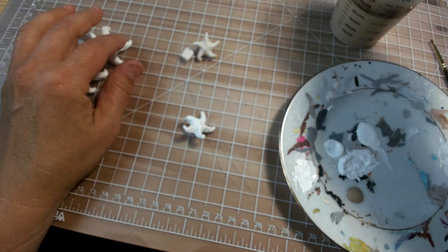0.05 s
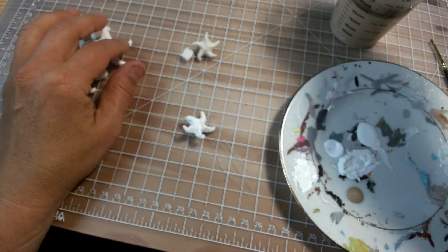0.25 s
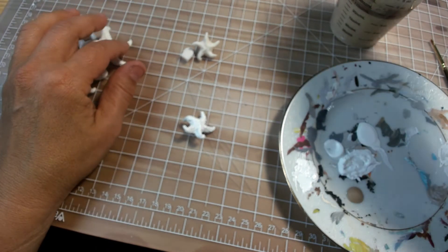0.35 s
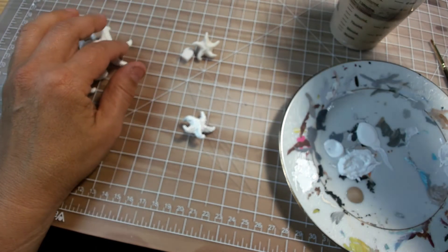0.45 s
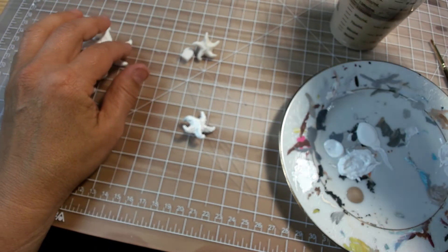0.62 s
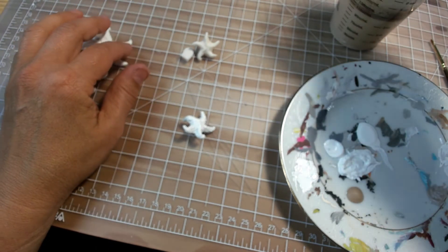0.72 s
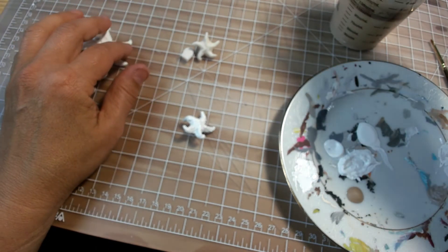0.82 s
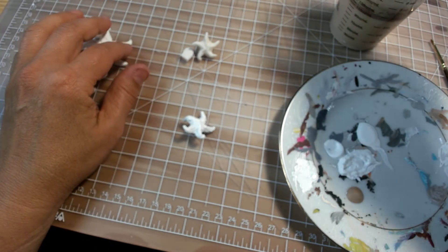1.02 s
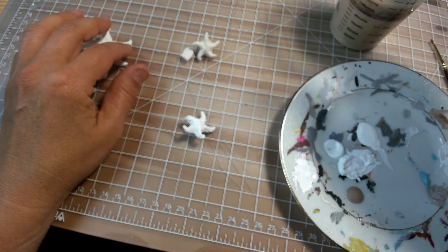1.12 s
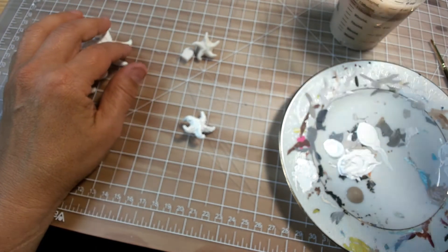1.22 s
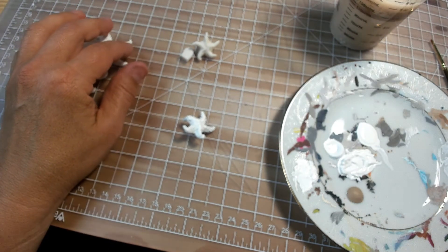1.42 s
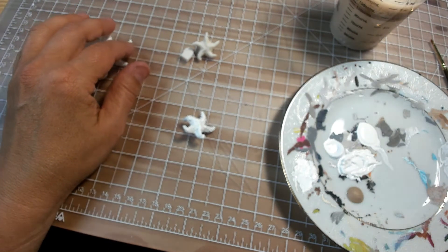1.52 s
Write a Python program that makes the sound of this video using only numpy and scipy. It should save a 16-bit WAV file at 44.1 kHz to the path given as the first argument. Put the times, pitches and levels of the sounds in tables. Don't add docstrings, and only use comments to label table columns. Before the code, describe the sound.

Bright, dry clacks of little ceramic-like pieces: faint ticks, a jostle, a loud double knock, several spaced knocks, a pause, then a drop with quick small bounces, heard close over soft indoor air rumble.

```python
import sys
import numpy as np
from scipy import signal
from scipy.fft import rfft, irfft
from scipy.io import wavfile
from scipy.ndimage import uniform_filter1d, map_coordinates

SR = 44100
rng = np.random.default_rng(int(sys.argv[2]) if len(sys.argv) > 2 else 0)


def attenuation_scalar(level_db):
    decades = np.asarray(level_db, float) / 20
    return 10 ** decades


def int16_out(signal):
    q = np.round(np.clip(np.atleast_2d(signal).T, -1, 1) * 32767)
    wavfile.write(sys.argv[1], SR, q.astype(np.int16))


N = 68355

# ratio to pitch, level in dB, t60 in s.
CLAY_MODES = [(.83, -20, 0.011), (.9, 0, 0.0147), (.965, 4, 0.0096), (1.06, 5, 0.0082), (1.135, 6, 0.0063),
              (1.22, -3, 0.0074), (1.34, 0, 0.014), (1.45, -37.5, 0.0056), (1.6, -36.5, 0.006),
              (2.1, -21.5, .004), (2.5, -27.5, .004)]
# frequency in Hz, level in dB, t60 in s.
PILE_MODES = [(3290, 2, 0.022), (3420, -2, 0.02), (3570, -1, .018), (3715, 1, 0.022), (2600, -3, 0.015),
              (4500, -6, .012)]
# frequency in Hz, level in dB, t60 in s.
MAT_MODES = [(600, -20, .03), (800, -12, 0.05), (855, -6, 0.08), (1033, -3, .06), (1325, -3, .045),
             (1385, 1, 0.075), (1455, -2, 0.045), (1800, -2, 0.03), (1950, 0, 0.022), (2070, 4, 0.03),
             (2500, -4, .015)]


def ring(modes, scale, t, chance):
    detune, scatter_db = 0.019, 4.5
    hz, db, t60 = np.array(modes).T[:, :, None]
    tuning, strength = chance[:, :len(modes), None]
    hz = np.minimum(hz * scale * (1 + detune * tuning), .45 * SR)
    decay = np.exp(-np.log(1000) * t / t60)
    y = (attenuation_scalar(db + scatter_db * strength) * np.sin(2 * np.pi * hz * t) * decay).sum(axis=0)
    return y / np.abs(y).max()


def contact_force(grit, t):
    blow_s, tick_db, chatter_s, chatter_db = 0.00084, -18, 0.0015, -11
    swell = t[:256] / chatter_s * np.exp(1 - t[:256] / chatter_s * 2)
    force = attenuation_scalar(chatter_db) * 1.615 * grit * swell
    force[0] += attenuation_scalar(tick_db)
    force[int(blow_s * SR)] += 1
    return force


def rattle_on(struck, rattle_s, t):
    rise_s = 0.0018
    shake = rng.standard_normal(len(t)) * (1 - np.exp(-t / rise_s)) * np.exp(-np.log(1000) * t / rattle_s)
    return signal.fftconvolve(shake / np.sqrt(np.sum(shake ** 2)), struck)[:len(t)]


def impact(mat_db, pile_db, spot_hz, modes, pitch_hz, scatter, free, rattle_db, rattle_s):
    clay_level_db, pile_level_db, mat_level_db, crack_db = -2.5, 12, 6.5, -38
    spot_db_per_oct, mat_rise_s = 13, .001
    t = np.arange(SR // 8) / SR
    chance = scatter * rng.standard_normal((3, 2, 12))
    grit = rng.standard_normal((2, 256))
    clay = attenuation_scalar(clay_level_db) * ring(modes, pitch_hz, t, chance[0])
    clay[:256] += attenuation_scalar(crack_db) * grit[1] * np.exp(-t[:256] / 0.0011)
    spot = [(hz, db - spot_db_per_oct * abs(np.log2(hz / spot_hz)), t60 * np.clip(free, .7, 1.3))
            for hz, db, t60 in MAT_MODES]
    mat = attenuation_scalar(mat_level_db + mat_db) * ring(spot, 1, t, chance[2])
    damped = [(hz, db, t60 * free) for hz, db, t60 in PILE_MODES]
    pile = attenuation_scalar(pile_level_db + pile_db) * ring(damped, 1, t, chance[1])
    rattle = rattle_on(clay + attenuation_scalar(-0.5) * mat + attenuation_scalar(-4.5) * pile, rattle_s, t)
    y = (mat + pile) * (1 - np.exp(-t / mat_rise_s))
    y = y + signal.fftconvolve(contact_force(grit[0], t), clay)[:len(t)]
    return y + attenuation_scalar(rattle_db + 6.5) * rattle


def strike(blows, modes, pitch_hz, top_hz, scatter, free, rattle_db, rattle_s):
    soft_dulls, late_s = 0.14, 0.00023
    out = np.zeros(N + SR)
    for s, db, mat_db, pile_db, spot_hz in blows:
        y = impact(mat_db, pile_db, spot_hz, modes, pitch_hz, scatter, free, rattle_db, rattle_s)
        edge_hz = min(top_hz * attenuation_scalar(soft_dulls * db), .45 * SR)
        edge = signal.butter(2, edge_hz, fs=SR, output="sos")
        i = int((s + late_s) * SR)
        out[i:i + len(y)] += attenuation_scalar(db) * signal.sosfilt(edge, y)
    return out[:N]


def larger_piece():
    # start in s, clay peak in dB, mat in dB re clay, pile in dB re clay, mat spot in Hz.
    large_blows = [(0.0648, -20, 4, -6, 1250), (0.0737, -36, -2, -35, 1410),
                   (0.0791, -29, 0.5, -12.5, 1300), (0.0817, -23, -28.5, -14.5, 810),
                   (0.2948, -35, -6, 2.5, 2070), (0.4369, -10.5, -4.5, -10.5, 2120),
                   (0.4499, -17, -5.5, -10, 2050), (0.4624, -33.5, -21, -20.5, 1370),
                   (0.547, -9, -6.5, -9.5, 1660), (0.6633, -15, -0.5, -3.5, 2120),
                   (0.7773, -3.5, -27, -15, 1450), (0.7887, -22, -3, -19.5, 1080)]
    return strike(large_blows, CLAY_MODES, pitch_hz=5780, top_hz=15700, scatter=1, free=0.89,
                  rattle_db=-20.5, rattle_s=0.15)


def smaller_piece():
    # start in s, clay peak in dB, mat in dB re clay, pile in dB re clay, mat spot in Hz.
    small_blows = [
        (0.3229, 4.5, -12.5, -17, 2060),
        (.3268, -9, -5.5, 0, 1390),
        (0.3302, 2.5, -16, -17.5, 1340),
        (0.346, -23.5, 0.5, -23, 1340),
        (.351, -17.5, -4.5, -5.5, 1400),
        (0.7673, -2, -11.5, -26.5, 1936),
    ]
    return strike(small_blows, CLAY_MODES, pitch_hz=5800, top_hz=13000, scatter=0.59, free=1,
                  rattle_db=-16, rattle_s=0.093)


def dropped_piece():
    # start in s, clay peak in dB, mat in dB re clay, pile in dB re clay, mat spot in Hz.
    landings = [
        (1.1502, -3, -8, -6, 1350),
        (1.1517, -1.5, -21, -9.5, 1630),
        (1.2068, -14.5, -13, -11.5, 1430),
        (1.2185, -45, 4, -15, 1420),
        (1.2296, -15, -14, -8, 1390),
        (1.2393, -19.5, -19.5, -10.5, 1390),
        (1.2485, -49, 2, -15, 1420),
        (1.2568, -24.5, -3, -18, 1390),
        (1.2637, -21, -14, -8.5, 1400),
        (1.2775, -29, -2.5, -8, 1400),
    ]
    # ratio to pitch, level in dB, t60 in s.
    loose_modes = [(.81, -19, 0.004), (.92, -7, 0.008), (.97, -1, .008), (1.02, 0, 0.008), (1.07, -2, .009),
                   (1.15, -4, .009), (1.27, -9, 0.008), (1.42, -6, 0.014), (1.5, -10, .008),
                   (2.3, -30.5, .004)]
    return strike(landings, loose_modes, pitch_hz=6000, top_hz=8000, scatter=0.94, free=0.87,
                  rattle_db=-19, rattle_s=.12)


def long_shove():
    # start in s, clay peak in dB, mat in dB re clay, pile in dB re clay, mat spot in Hz.
    jostles = [
        (0.2009, -33, -6.5, -20.5, 790),
        (0.2012, -11, -4, -16, 2010),
        (.2038, -15, 0, -18, 2086),
        (0.2115, -17.5, -12, -6, 1472),
        (0.2182, -26.5, -2, -12.5, 1390),
        (.2222, -24, -22, -12, 1395),
        (.2298, -30, 3, -13, 1380),
    ]
    # ratio to pitch, level in dB, t60 in s.
    wedged_modes = [(.88, -11.5, 0.01), (1.0, 4, 0.023), (1.08, 0, .015), (1.11, -5, 0.016),
                    (1.26, 1, 0.034), (1.36, -5, 0.022), (1.61, -5, 0.027), (1.8, -23.5, .004),
                    (2.4, -24.5, 0.0034)]
    return strike(jostles, wedged_modes, pitch_hz=5170, top_hz=12800, scatter=0.98, free=1,
                  rattle_db=-12, rattle_s=0.089)


def light_touches():
    # start in s, clay peak in dB, mat in dB re clay, pile in dB re clay, mat spot in Hz.
    brushes = [
        (.4200, -36.5, 12.5, 2, 1570),
        (.531, -39, 1, 11, 1900),
        (.876, -43, -16, -8, 1400),
    ]
    return strike(brushes, CLAY_MODES, pitch_hz=6500, top_hz=9200, scatter=0.71, free=.7,
                  rattle_db=-26, rattle_s=0.065)


def padded_nudges():
    # start in s, clay peak in dB, mat in dB re clay, pile in dB re clay, mat spot in Hz.
    pushes = [
        (.0665, -47.5, 15, 9, 790),
        (.2035, -34.5, 13.5, 11.5, 850),
        (.227, -45, 19.5, 10, 850),
        (.358, -37, 18.5, 1.5, 1550),
        (.336, -30.5, 15, -5.5, 1090),
        (.772, -40.5, 23, -1.5, 1072),
        (1.154, -44, 6, 11, 920),
        (1.364, -46, 0.5, 7, 1100),
    ]
    return strike(pushes, CLAY_MODES, pitch_hz=3400, top_hz=4800, scatter=0.65, free=0.24,
                  rattle_db=-21, rattle_s=.08)


def level(x, db):
    return x * attenuation_scalar(db) / np.sqrt(np.mean(x ** 2))


def colour(x, points):
    hz, db = np.array(points).T
    f = np.maximum(np.arange(len(x) // 2 + 1) * SR / len(x), 1)
    return irfft(rfft(x) * attenuation_scalar(np.interp(np.log(f), np.log(hz), db)), len(x))


def walk(rate):
    k = int(SR / rate)
    steps = np.repeat(rng.standard_normal(N // k + 1), k)
    return 1.5 * uniform_filter1d(uniform_filter1d(steps, k), k)[:N]


def slide():
    # time in s, level in dB.
    slide_db = [(0, -93), (.06, -84), (.09, -57), (.17, -74.5), (0.2, -71), (.24, -60), (.27, -63),
                (0.288, -46.5), (.31, -56), (.37, -70.5), (0.499, -65), (0.629, -71.5), (.8, -59),
                (0.869, -71.5), (1.0, -85.5), (1.19, -83), (1.25, -61), (1.33, -88.5)]
    # frequency in Hz, level in dB per Hz.
    scrape = [(700, -23.5), (1600, 4), (2700, -10.5), (3500, 0), (5300, 1.5), (8000, 2), (10000, -16),
              (16000, -22.5)]
    grains_per_s, grain_db = 4000, 2
    s, db = np.array(slide_db).T
    falls = rng.random(N) < grains_per_s / SR
    sizes = attenuation_scalar(grain_db * np.minimum(rng.exponential(size=N), 3))
    rub = falls * rng.standard_normal(N) * sizes + 0.97 * rng.standard_normal(N)
    t, still = np.arange(SR // 16) / SR, np.zeros((2, 12))
    body = ring(PILE_MODES, 0.93, t, still) + 0.73 * ring(MAT_MODES, 1, t, still)
    body = body + 1.5 * ring(CLAY_MODES, 5780, t, still)
    direct = level(colour(rub, scrape), 11.0)
    ringing = level(signal.fftconvolve(rub, body)[:N], -7.0)
    return (direct + ringing) * attenuation_scalar(np.interp(np.arange(N) / SR, s, db) + 5.4 * walk(57))


def room(x):
    room_db, room_t60_s, treble_t60_s, gap_s = -15.5, 0.4, 0.4, 0.0024
    nearby_db, nearby_t60_s = -0.5, 0.063
    # frequency in Hz, level in dB.
    wall = [(500, 14), (1400, -3.5), (3500, -1), (6000, -4), (8800, -13), (10500, -16.5), (16000, -30)]
    t = np.arange(SR // 2) / SR
    n = rng.standard_normal(len(t))
    low = signal.sosfilt(signal.butter(2, 4000, fs=SR, output="sos"), n)
    ir = low * np.exp(-np.log(1000) * t / room_t60_s)
    ir = ir + (n - low) * np.exp(-np.log(1000) * t / treble_t60_s)
    ir = ir + attenuation_scalar(nearby_db) * n * np.exp(-np.log(1000) * t / nearby_t60_s)
    ir = colour(ir, wall) * (1 - np.exp(-(t / gap_s) ** 2))
    return attenuation_scalar(room_db) * signal.fftconvolve(x, ir / np.sqrt(np.sum(ir ** 2)))[:N]


def ventilation():
    # frequency in Hz, level in dB per Hz.
    air = [(18, -54.5), (80, -26), (105, -9.5), (255, -4), (520, -16), (2000, -32), (6000, -46.5),
           (9500, -92), (16500, -79.5)]
    # frequency in Hz, width in Hz, rms level in dB.
    duct = [(154, 40, -54.5), (212.9, 5, -51.5), (248.8, 8, -51), (317, 16, -58)]
    y = level(colour(rng.standard_normal(N), air), -45.5) * attenuation_scalar(2.0 * walk(9.9))
    for hz, width_hz, db in duct:
        peak = signal.iirpeak(hz, hz / width_hz, fs=SR)
        y = y + level(signal.lfilter(*peak, rng.standard_normal(N)), db)
    return y


def mains_hum():
    hum_hz, hum_db, wobble_db = 120.3, -51.5, 2.5
    swell = np.sqrt(2) * attenuation_scalar(hum_db + wobble_db * walk(9.9))
    return swell * np.sin(2 * np.pi * hum_hz * np.arange(N) / SR + 0.17 * walk(15))


def scene():
    radiate_hz, echo_s, echo_db = 640, 0.000411, -30.5
    pieces = larger_piece() + long_shove() + smaller_piece()
    pieces = pieces + light_touches() + dropped_piece() + padded_nudges()
    radiation = signal.butter(3, radiate_hz, "high", fs=SR, output="sos")
    near = signal.sosfilt(radiation, pieces + slide())
    heard = near + room(near)
    mirror = map_coordinates(heard, [np.arange(N) - echo_s * SR], mode="nearest")
    return (0.82 * (heard - attenuation_scalar(echo_db) * mirror) + ventilation() + mains_hum())[None]


def top_cut(x):
    return signal.sosfilt(signal.butter(12, 16860, fs=SR, output="sos"), x)


def record(dry):
    top = signal.ellip(8, .2, 70, 16300, fs=SR, output="sos")
    mix = signal.sosfilt(top, np.tanh(dry))
    return top_cut(mix)


dry = scene()
out = record(dry)
int16_out(out)
```